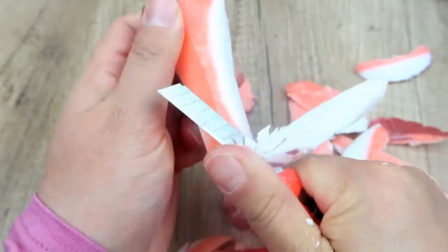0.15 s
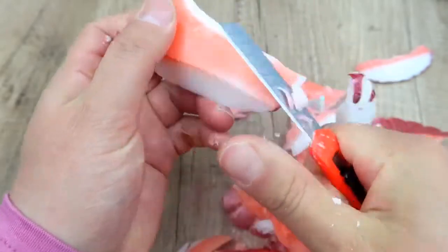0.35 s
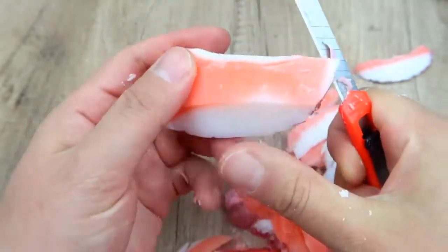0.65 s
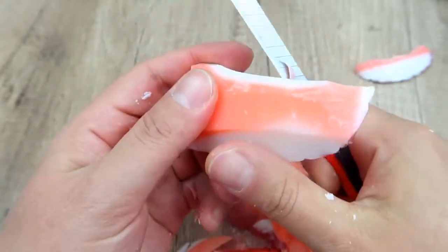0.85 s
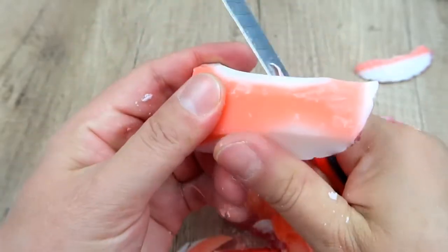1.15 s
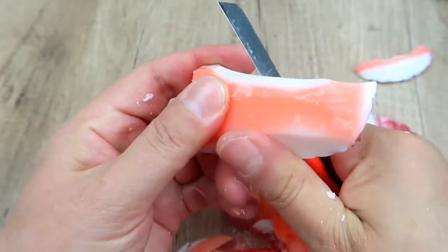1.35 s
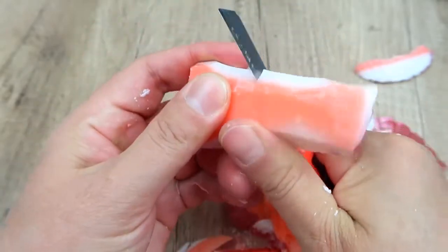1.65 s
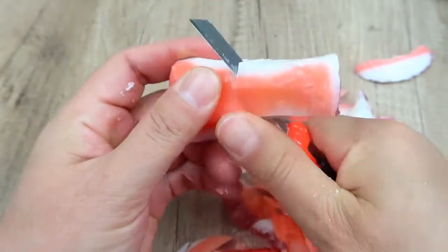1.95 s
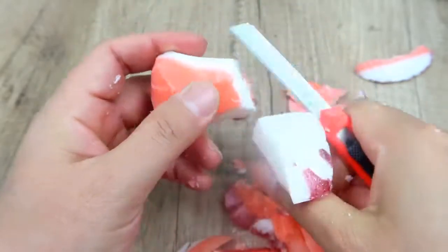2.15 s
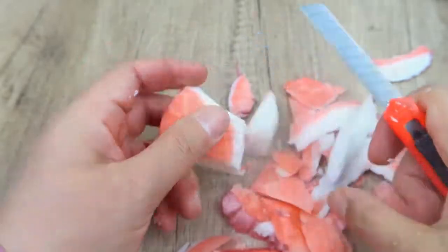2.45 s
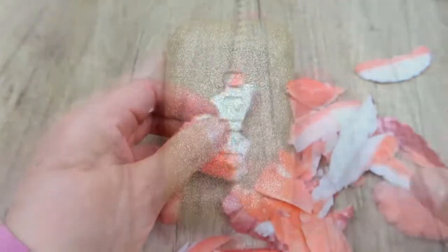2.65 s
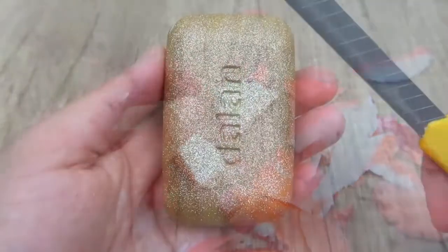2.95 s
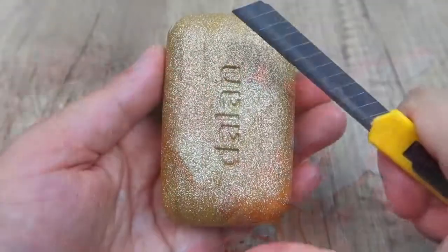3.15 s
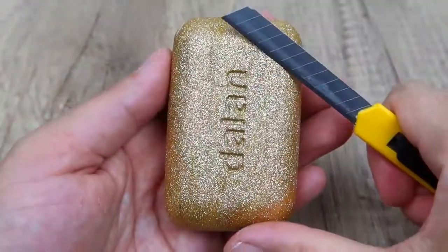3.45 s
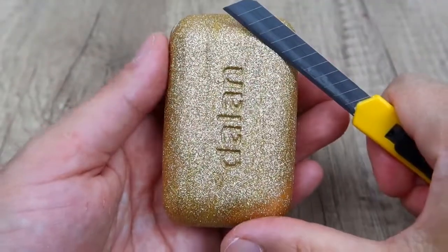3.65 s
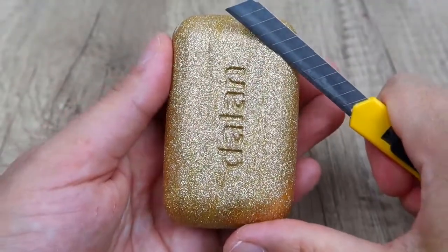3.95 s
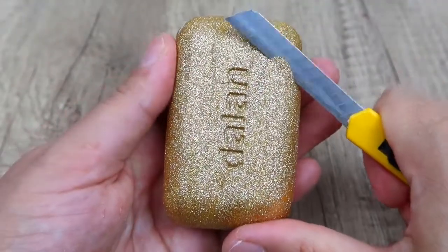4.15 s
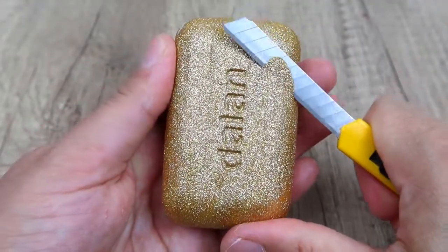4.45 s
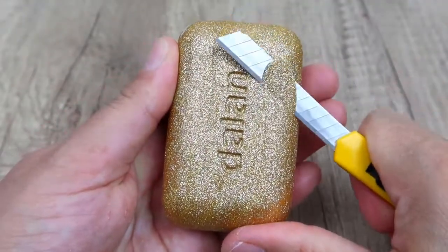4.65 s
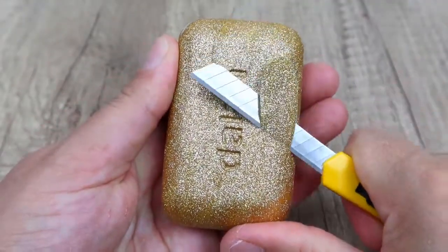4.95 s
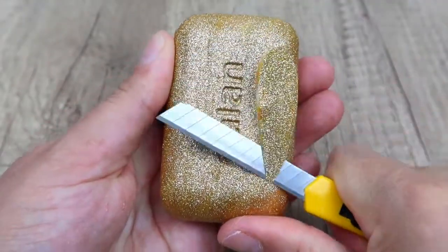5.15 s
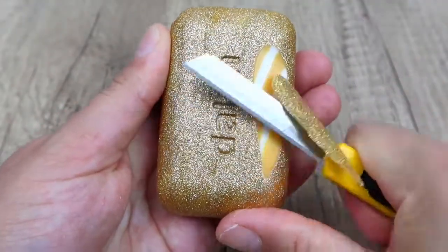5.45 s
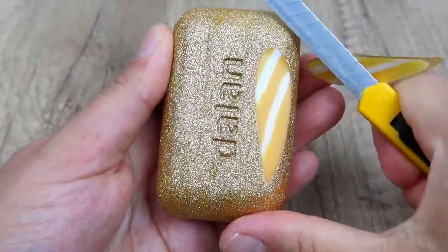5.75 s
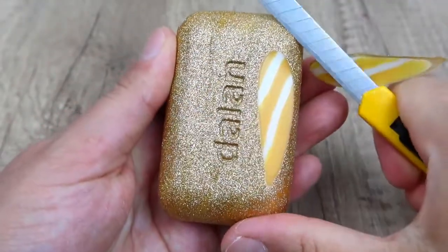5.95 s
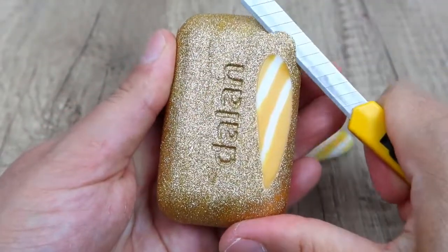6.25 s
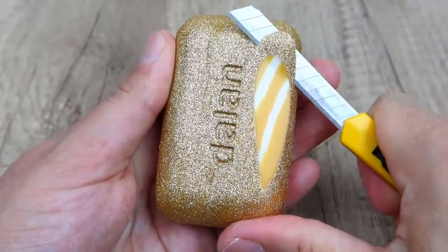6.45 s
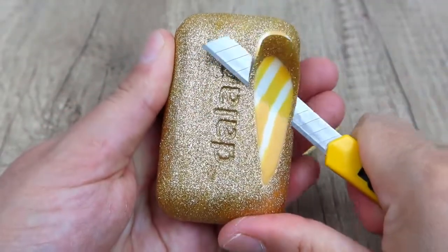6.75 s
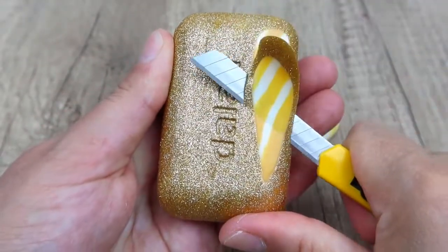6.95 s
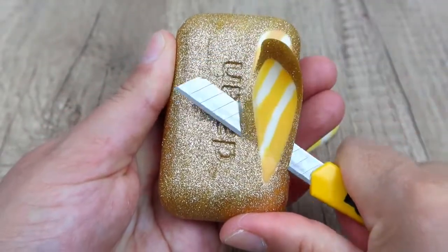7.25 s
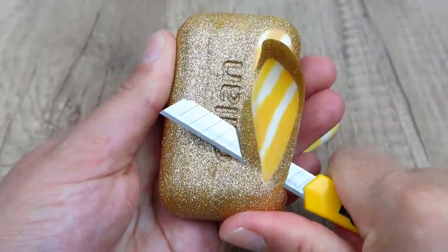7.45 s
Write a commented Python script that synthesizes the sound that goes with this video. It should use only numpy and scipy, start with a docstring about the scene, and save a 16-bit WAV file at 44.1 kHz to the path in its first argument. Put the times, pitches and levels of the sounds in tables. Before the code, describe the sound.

Close-up soap cutting: crisp blade ticks, short gritty scrapes, a sharp clatter of falling chunks with low thuds, then delicate curling crackles over faint room noise.

```python
"""A quiet room with a wooden table: a utility knife pares bars of soap close to the microphone.
The blade ticks and crackles (short contacts ringing blade and chip) and hisses in fine grains (shaped clicks).
Cut pieces clack on the pile and ring the table modes; crumbs slide, hands rumble (shaped sparse clicks).
Low thuds are damped sines; steady room noise and a faint whine lie underneath."""
import sys
import numpy as np
from scipy import signal
from scipy.fft import rfft, irfft
from scipy.io import wavfile
from scipy.ndimage import uniform_filter1d, minimum_filter1d

SR = 44100
rng = np.random.default_rng(int(sys.argv[2]) if len(sys.argv) > 2 else 0)


def generate_wav(sig):
    """Save sig (samples, or channels by samples) to the path in sys.argv[1] as 16-bit PCM at SR."""
    pcm = np.round(np.clip(np.atleast_2d(sig).T, -1, 1) * 32767).astype(np.int16)
    wavfile.write(sys.argv[1], SR, pcm)


N = 335601
TIME_S = np.arange(N) / SR
IR_SAMPLES = 4096
IR_TIME_S = np.arange(IR_SAMPLES) / SR
IR_HZ = np.fft.rfftfreq(IR_SAMPLES, 1 / SR) + 1  # +1 avoids zero


def amp(db):
    """Decibels to gain."""
    return 10 ** (np.asarray(db) / 20)


def unit(x):
    """Scales to rms 1."""
    return x / np.sqrt(np.mean(x ** 2) + 1e-20)


def read(points, hz):
    """Interpolates a table on a log-frequency axis."""
    f, value = np.transpose(points)
    return np.interp(np.log(hz + 1), np.log(f + 1), value)


def add(mix, at_s, sound):
    """Mixes a sound in at a time."""
    part = mix[max(round(at_s * SR), 0):][:len(sound)]
    part += sound[:len(part)]


def causal(gain):
    """Minimum-phase impulse response with this gain over IR_HZ, by folding the cepstrum."""
    cepstrum = irfft(np.log(np.maximum(gain, 1e-5 * gain.max())))
    cepstrum[1:IR_SAMPLES // 2] *= 2
    cepstrum[IR_SAMPLES // 2 + 1:] = 0
    return irfft(np.exp(rfft(cepstrum)))


def coloured(x, spectrum):
    """Gives a long signal a spectrum, at rms 1."""
    response = causal(amp(read(spectrum, IR_HZ)))
    return unit(signal.oaconvolve(x, response)[:N])


def grains(per_s, spread_db):
    """Sparse clicks of random sign at rms 1: many small, a few large."""
    size = amp(spread_db * np.minimum(rng.exponential(1, N), 4))
    sign = rng.choice([-1, 1], N)
    present = rng.random(N) < per_s / SR
    return unit(size * sign * present)


def uneven(db, samples):
    """Gain that flickers from one bunch of grains to the next."""
    return amp(db * unit(uniform_filter1d(rng.standard_normal(N), size=samples)))


def swell(at_s, level_db, rise_s, fall_s, hold_s=0):
    """Gain of one movement: builds up until at_s, holds, dies away; rise and fall are times per 20 dB."""
    early_s = np.maximum(at_s - TIME_S, 0)
    late_s = np.maximum(TIME_S - at_s - hold_s, 0)
    return amp(level_db - 20 * (early_s / rise_s + late_s / fall_s))


def resonance(hz, db, sharpness):
    """Power gain of one resonant peak over IR_HZ."""
    return amp(db) ** 2 / (1 + (sharpness * (IR_HZ / hz - hz / IR_HZ)) ** 2)


def contact(low_hz, top_hz, ring_hz, ring_db, sharpness, crack_db, crack_hz, crack_s):
    """One contact: a band-limited push with one short resonance, and a bright burst of crushed soap."""
    radiation = 1 / (1 + (low_hz / IR_HZ) ** 4)
    push = 1 / (1 + (IR_HZ / top_hz) ** 8)
    ring = 1 + resonance(ring_hz, ring_db, sharpness)
    burst = rng.standard_normal(IR_SAMPLES) * np.exp(-IR_TIME_S / crack_s)
    burst /= np.linalg.norm(burst)
    crack_filter = causal(np.sqrt(radiation / (1 + (IR_HZ / crack_hz) ** 2)))
    crack = signal.fftconvolve(burst, crack_filter)[:IR_SAMPLES]
    return causal(np.sqrt(radiation * push * ring)) + amp(crack_db) * crack


def at_level(sound, db):
    """Scales a short sound so that its energy, spread over 10 ms, has this level."""
    return amp(db) * sound * np.sqrt(.01 * SR / np.sum(sound ** 2))


def mic_hiss(level_db):
    """Microphone hiss: high-passed white noise, opposite in the two channels."""
    high_pass = signal.butter(1, 5000, "high", fs=SR, output="sos")
    side = amp(level_db) * signal.sosfilt(high_pass, rng.standard_normal(N))
    return np.array([side, -side])


# room noise spectrum: [f/Hz, relative level/dB]
AIR_SPECTRUM = [(13, -47.5), (22, -20), (53, 4.5), (76, -5), (100, -3.5), (457, -13), (602, -15),
                (815, -17.5), (2080, -22.5), (14300, -29.5), (16000, -25.5)]
# whine of electronics: [f/Hz, rms level/dB]
WHINE_TONES = [(14804, -77.5), (14865, -80)]


def room_tone(air_db=-51.5, waver_db=1):
    """Steady room noise whose bass wavers slowly, and a faint electronic whine."""
    waver = uneven(waver_db, samples=9000)
    air = amp(air_db) * coloured(rng.standard_normal(N), AIR_SPECTRUM)
    rumble = signal.sosfilt(signal.butter(1, 500, fs=SR, output="sos"), air)
    whine = sum(amp(db) * np.sqrt(2) * np.sin(2 * np.pi * hz * TIME_S) for hz, db in WHINE_TONES)
    return air + (waver - 1) * rumble + whine


# room decay: [f/Hz, t60/s]
ROOM_DECAY = [(150, 0.17), (700, 0.19), (2000, 0.15), (8000, 0.082)]


def room(x):
    """A small room: a diffuse noise tail whose treble dies fastest."""
    hz, t, bins = signal.stft(rng.standard_normal(SR // 2), SR, nperseg=256)
    decay = amp(-60 * t / read(ROOM_DECAY, hz)[:, None])
    tail = signal.istft(bins * decay, SR)[1]
    return signal.oaconvolve(x, tail / np.linalg.norm(tail))[:N]


# table and hands shuffling: [hold start t/s, level/dB, hold/s, fall per 20 dB/s]
SHUFFLE_MOVES = [(0.509, -30.5, 0.12, .17), (2.436, -31, .005, 0.17), (2.567, -38.5, 0.29, 0.075),
                 (6.101, -41, 0.014, 0.29)]
# shuffle filter: [f/Hz, relative level/dB]
SHUFFLE_SPECTRUM = [(29, -56.5), (50, -8.5), (130, 1.5), (260, -9.5), (344, -2), (1200, -34.5), (1560, -61),
                    (2640, -120)]


def shuffles(rise_s=0.028):
    """Hands and table rub in sparse grains, filtered dull."""
    moves = sum(swell(at_s, db, rise_s, fall_s, hold_s) for at_s, db, hold_s, fall_s in SHUFFLE_MOVES)
    return moves * coloured(grains(per_s=900, spread_db=3.0), SHUFFLE_SPECTRUM)


# crumbs sliding on the pile: [peak t/s, level/dB, rise per 20 dB/s, fall per 20 dB/s]
CRUMB_SLIDES = [(.545, -36.5, 0.044, 0.051), (.63, -41.5, 0.26, .33), (2.435, -41, 0.023, .24),
                (2.683, -41, 0.013, 0.13), (2.87, -36, 0.026, 0.043)]
# crumb filter: [f/Hz, relative level/dB]
CRUMB_SPECTRUM = [(290, -18), (500, -10), (1290, -6.5), (1420, -3), (1830, -5.5), (14000, -32)]


def crumbs(clump_db=3.0):
    """Crumbs slide and settle in gritty clumps of grains."""
    sliding = sum(swell(*row) for row in CRUMB_SLIDES)
    grit = grains(per_s=3500, spread_db=3) * uneven(clump_db, samples=200)
    return sliding * coloured(grit, CRUMB_SPECTRUM)


# thuds of blade breaking through or piece landing: [t/s, level/dB before doubling, f/Hz, t60/s]
THUDS = [(0.198, -46.5, 126.2, 0.93), (0.549, -30, 62, 0.081), (1.786, -34, 119, .16),
         (1.825, -41, 46, 0.38), (2.432, -27, 61.3, 0.16), (2.585, -29.5, 60, 0.14),
         (5.312, -37, 61.5, 0.26)]


def jolts(rise_s=0.0042):
    """Low damped swings with a soft onset."""
    out, t = np.zeros(N), TIME_S[:SR // 2]
    onset = 2 * (1 - np.exp(-t / rise_s))
    for at_s, db, hz, t60_s in THUDS:
        add(out, at_s, amp(db - 60 * t / t60_s) * onset * np.sin(2 * np.pi * hz * t))
    return out


# table-top modes: [f/Hz, relative level/dB, t60/s]
TABLE_MODES = [(123, -38, 0.63), (206.3, -22.5, 0.14), (340, -38.5, 0.18), (467.6, -44, 0.083),
               (579.3, -28.5, 0.051), (757, -66, .08), (1308, -32, 0.043)]


def table_ring(blows):
    """Blows excite the decaying modes of the table top."""
    t = TIME_S[:SR // 2]
    wood = sum(amp(db - 60 * t / t60_s) * np.cos(2 * np.pi * hz * t) for hz, db, t60_s in TABLE_MODES)
    return signal.oaconvolve(blows, wood)[:N]


# pieces landing: [t/s, direct-blow level over 10 ms/dB, contact cut-off f/Hz,
# ring of piece or spot hit f/Hz, relative crack level/dB]
LANDINGS = [(0.4968, -28.5, 655, 1530, -33), (0.5358, -24, 860, 387, -32), (0.5427, -31, 605, 1600, -32),
            (0.6266, -38, 1900, 300, -34), (0.6277, -26.5, 1620, 338, -32),
            (2.4224, -14.5, 3542, 2210, -26.5), (2.5066, -31.5, 1450, 305, -16.5),
            (2.5332, -12.5, 1480, 273, -38), (2.557, -29, 480, 297, -42), (2.5653, -19.5, 1270, 430, -36),
            (2.5825, -26.5, 1210, 305, -32), (2.6626, -27, 1540, 306, -32), (2.6769, -28, 2710, 316, -7.5),
            (2.704, -30.5, 556, 1390, -51), (2.7529, -28.5, 382, 297, -47), (2.8067, -27, 930, 1670, -31),
            (6.378, -27.5, 5400, 1440, -5.5), (6.3884, -36.5, 490, 650, -7), (6.466, -36.5, 1360, 1780, -4),
            (6.5025, -42, 1390, 1770, -10)]


def knocks(low_hz=195, ring_db=12, echo_s=0.002473, echo=0.3, table_db=-16, spread_hz=1200):
    """Each piece lands, a short echo follows 2.5 ms later, and the table top rings."""
    out = np.zeros(N)
    for at_s, db, top_hz, ring_hz, crack_db in LANDINGS:
        blow = contact(low_hz, top_hz, ring_hz, ring_db, sharpness=6.7,
                       crack_db=crack_db, crack_hz=3060, crack_s=0.0013)
        blow = at_level(blow, db)
        add(out, at_s, blow)
        add(out, at_s + echo_s, echo * blow)
    # bending waves carry treble faster than bass: all-pass spreads each blow
    lag = np.exp(-2 * np.pi * spread_hz / SR)
    out = signal.lfilter([-lag, 1], [1, -lag], out)
    return out + amp(table_db) * table_ring(out)


# blade sliding through soap: [peak t/s, level/dB, rise per 20 dB/s, fall per 20 dB/s]
BLADE_STROKES = [(1.1, -49.5, .03, 0.035), (1.788, -43.5, .02, 0.018), (2.3, -57, 0.38, .15),
                 (5.22, -49, 0.66, 0.089), (5.264, -42, .025, 0.018), (5.308, -44, .06, 0.04),
                 (6.74, -52, 0.49, 0.25), (7.58, -60, 1.7, 0.23)]
# scrape filter: [f/Hz, relative level/dB]
SCRAPE_SPECTRUM = [(600, -6), (1700, -5.5), (2300, -2), (4400, -1.5), (5600, -6.5), (6500, -13.5),
                   (9000, -12), (15000, -30)]


def scrape(slip_db=3.0, flake_db=-9):
    """Tiny fractures along the edge, bunched by sticking and slipping, and a few larger flakes breaking."""
    strokes = sum(swell(*row) for row in BLADE_STROKES)
    fine = unit(grains(per_s=9000, spread_db=3.5) * uneven(slip_db, samples=180))
    flakes = amp(flake_db) * grains(per_s=54, spread_db=5.5)
    return strokes * coloured(fine + flakes, SCRAPE_SPECTRUM)


def chattering(sound, strength, decay_s):
    """Follows a contact with a quickly dying swarm of tiny ones."""
    swarm = strength * rng.standard_normal(IR_SAMPLES) * np.exp(-IR_TIME_S / decay_s)
    swarm[0] = 1
    return signal.fftconvolve(sound, swarm)[:IR_SAMPLES]


# bending modes of the blade: [f/Hz, relative level/dB]
BLADE_MODES = [(1500, -7), (2850, -1.5), (4500, 12.5)]


def tick(level_db, ring_hz, crack_db, chatter_s, top_hz=4700, chatter=0.12, blade_sharpness=14):
    """The soap gives way with a snap and a brief chatter, which ring the blade and the chip."""
    modes = sum(resonance(hz, db, blade_sharpness) for hz, db in BLADE_MODES)
    steel = causal(np.sqrt(3 + modes))
    low_hz = 0.29 * ring_hz  # chip radiates little below this
    chip = contact(low_hz, top_hz, ring_hz, ring_db=14, sharpness=10.6,
                   crack_db=crack_db, crack_hz=7140, crack_s=0.001)
    struck = signal.fftconvolve(chip, steel)
    return at_level(chattering(struck, chatter, chatter_s), level_db)


def specks(per_s=2.5, mid_db=-63.5, spread_db=10, ring_hz=(2300, 4870), crack_db=-20, chatter_s=0.0017):
    """Faint specks break off at random times, levels and pitches."""
    out = np.zeros(N)
    for when, size, pitch in rng.random((round(per_s * N / SR), 3)):
        db = mid_db + spread_db * (2 * size - 1)
        hz = np.interp(pitch, [0, 1], ring_hz)
        add(out, when * N / SR, tick(db, hz, crack_db, chatter_s))
    return out


# shaving cracking as it curls away: [t/s, level over 10 ms/dB]
SHAVING_SNAPS = [(4.8774, -52.5), (5.051, -48), (6.48, -50.5), (7.3672, -46.5), (7.4128, -46),
                 (7.4389, -44), (7.4616, -45), (7.5448, -50), (7.5866, -44)]


def snaps(ring_hz=4250, crack_db=5.5, chatter_s=0.0012):
    """The curling shaving cracks, with the same bright settings each time."""
    out = np.zeros(N)
    for at_s, db in SHAVING_SNAPS:
        add(out, at_s, tick(db, ring_hz, crack_db, chatter_s))
    return out


# blade ticking on soap: [t/s, level over 10 ms/dB, ring f/Hz, relative crack level/dB, chatter decay/s]
BLADE_TICKS = [(0.1275, -49.5, 2400, -24, .0013), (0.4173, -37.5, 2380, -28, .003),
               (0.4213, -30.5, 4240, -4, 0.0021), (0.6842, -42, 3910, -7, .0018),
               (0.935, -40.5, 3540, -7, .0016), (1.701, -39.5, 2080, 1.5, 0.0012),
               (1.9949, -48, 3860, 0, .0014), (2.025, -42.5, 2110, -9, .0022),
               (2.1947, -45.5, 2770, -24, .0009), (2.877, -34, 3320, -30, .001),
               (2.921, -42.5, 3500, -30, .0016), (3.5648, -40, 1670, -21.5, 0.0045),
               (3.578, -34.5, 1230, -11.5, 0.0064), (3.5962, -36.5, 4400, -12, .002),
               (3.6124, -42.5, 1590, -7, 0.0026), (3.6285, -40.5, 2830, -18, .0066),
               (4.1127, -40.5, 1370, -16, 0.011), (5.3228, -46, 1110, -3, .001),
               (5.9092, -45, 1380, -31, 0.0033), (6.0223, -47.5, 5000, -9, 0.00078),
               (6.1437, -36.5, 1370, -17, 0.0066)]


def ticks():
    """The blade bites in separate ringing contacts."""
    out = np.zeros(N)
    for at_s, *row in BLADE_TICKS:
        add(out, at_s, tick(*row))
    return out


def scene(knock_room_db=-16, tick_room_db=-16, side_hiss_db=-67, dip_at_s=2.888):
    """All sounds sit in the middle; only the microphone hiss differs between the ears."""
    falls = knocks()
    blade = specks() + snaps() + ticks() + scrape()
    reverb = amp(knock_room_db) * room(falls) + amp(tick_room_db) * room(blade)
    action = shuffles() + crumbs() + jolts() + falls + blade + reverb
    # everything but the background drops abruptly, then recovers
    dip = np.interp(TIME_S - dip_at_s, [-.005, .005, .3, .5], [1, .4, .4, 1])
    return action * dip + room_tone() + mic_hiss(side_hiss_db)


def record(dry, edge_hz=15800):
    """A fast limiter restrains peaks above full scale; then a low-pass sets the band limit."""
    headroom = 1 / np.maximum(abs(dry).max(axis=0), 1)
    gain = uniform_filter1d(minimum_filter1d(headroom, size=7), size=7)
    low_pass = signal.firwin(255, edge_hz, window=("kaiser", 8), fs=SR)
    return signal.oaconvolve(dry * gain, low_pass[None], "same")


dry = scene()
out = record(dry)
generate_wav(out)
```